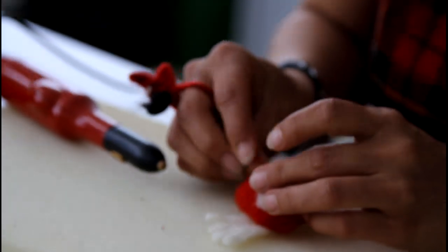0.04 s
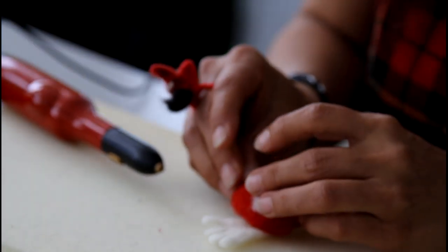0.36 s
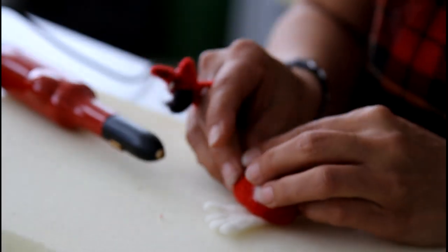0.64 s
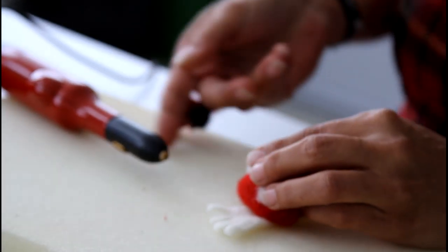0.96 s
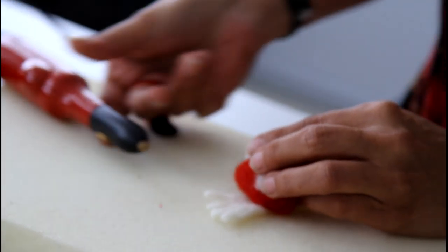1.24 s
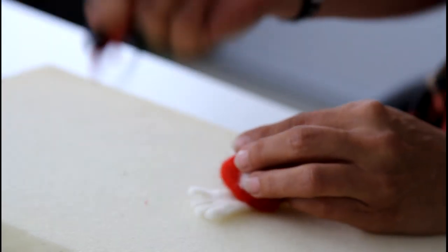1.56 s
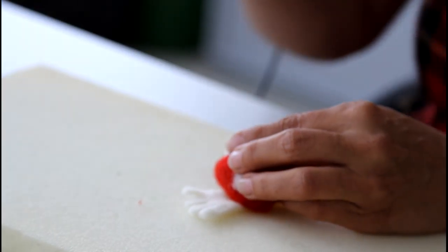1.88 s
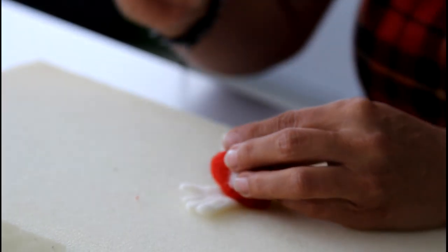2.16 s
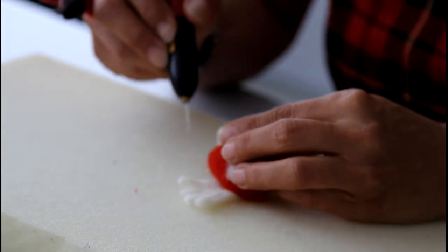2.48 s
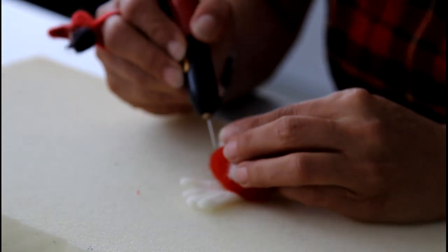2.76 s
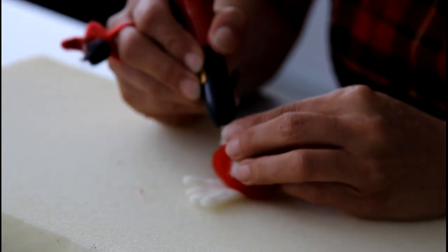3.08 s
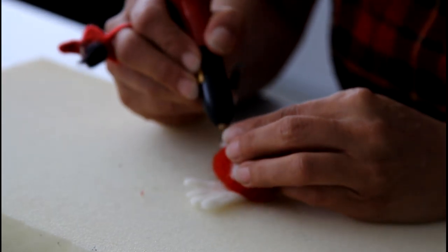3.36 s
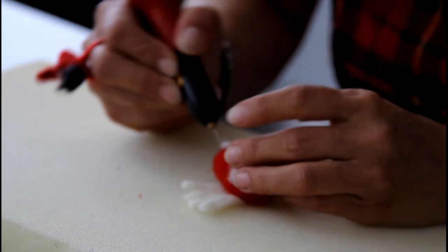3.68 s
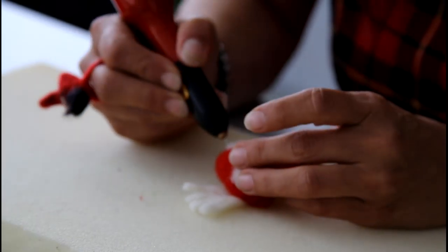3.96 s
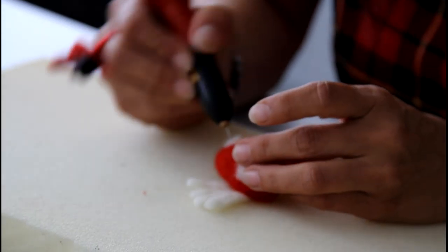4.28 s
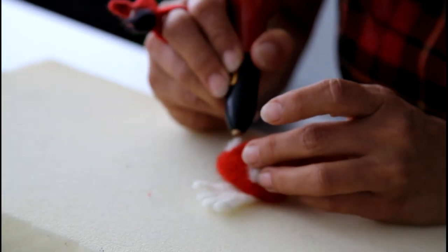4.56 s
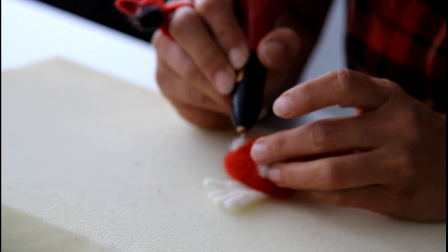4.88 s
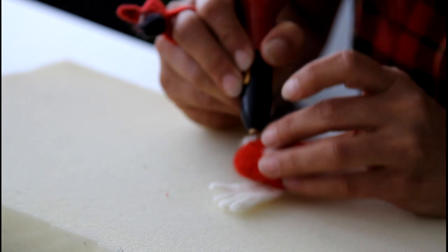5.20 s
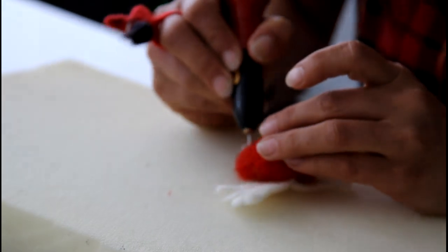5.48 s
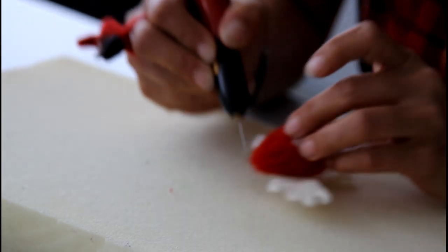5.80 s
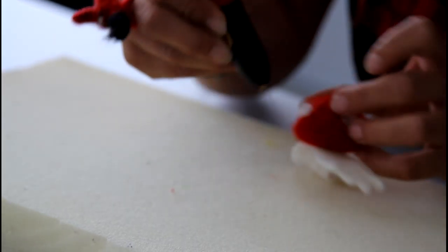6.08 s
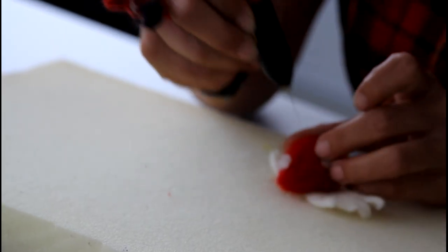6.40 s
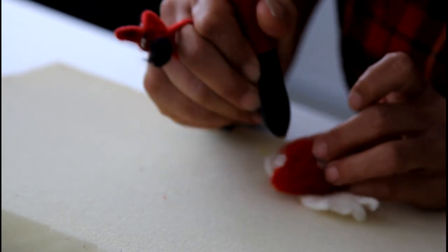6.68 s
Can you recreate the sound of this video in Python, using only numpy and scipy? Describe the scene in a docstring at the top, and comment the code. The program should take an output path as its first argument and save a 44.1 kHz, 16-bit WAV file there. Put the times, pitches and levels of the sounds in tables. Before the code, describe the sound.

In a quiet small room, hands set down a small tool and pick up an electric felting pen, with light plastic clacks and faint rubbing on a foam pad. The pen then starts and runs loudly: a fast, uneven rattle in a plastic casing, with a soft rasp of the needle in wool underneath. Midway through the rattle the table gives a brief low boom, and the pen carries on. The sound is close.

```python
"""In a quiet room, hands put a small tool down on a work table and pick up an electric felting pen.
At 2.4 s the pen starts: its needle bar shuttles about 37 times a second, knocking, bouncing and
chattering in a plastic casing whose ringing shifts with the grip. Each stroke punches the needle
into wool on a foam pad with a soft rasp. Near 4.6 s the table booms briefly; the pen runs on."""
import sys
import numpy as np
from scipy import signal
from scipy.fft import rfft, irfft
from scipy.io import wavfile

SR = 44100
rng = np.random.default_rng(int(sys.argv[2]) if len(sys.argv) > 2 else 0)


def inscribe(sig):
    """Save sig as 16-bit PCM at rate SR to the path in sys.argv[1].

    A 1-D sig is mono; a 2-D sig holds one channel per row.
    Samples are clipped to [-1, 1] before scaling.
    """
    pcm = np.round(np.clip(np.atleast_2d(sig).T, -1, 1) * 32767)
    wavfile.write(sys.argv[1], SR, pcm.astype(np.int16))


N = 297234
TIME = np.arange(N) / SR
PEN_LIFTED_S, START_S, STROKES_PER_S = 1.4, 2.402, 37

# Levels are relative: they compare the rows of a table, and the functions set the final loudness.
# hard knocks that stand out of the rattle: (time [s], level [dB], extra treble [dB])
HARD_KNOCKS = [(2.4311, -14.5, 5.5), (2.4655, -11, 3), (2.498, -14, 8), (2.5804, -12.5, -6),
               (2.6352, -12, 0), (2.7426, -9, -3), (2.776, -11, -2), (2.8439, -10, 3), (2.8787, -10, -4),
               (3.062, -12, 7), (3.2006, -9.5, -10), (3.3597, -11.5, 0), (3.5796, -11, -1),
               (3.66, -12.5, -2), (3.7744, -12, -8), (3.8817, -14, -6), (3.9819, -12.5, -4),
               (4.019, -13, -1), (4.3946, -12.5, -3), (4.5511, -15.5, 7), (4.7156, -14.5, 2),
               (4.8475, -15.5, 9), (5.0425, -12, -8), (5.1722, -16, 5), (5.284, -8.5, -7),
               (5.416, -11.5, -9), (5.4698, -10, -8), (5.5504, -17, 8), (5.5769, -13.5, 1),
               (5.6625, -14, -6), (5.936, -14, -1), (6.1212, -12.5, 1), (6.388, -11.5, -2),
               (6.4587, -15.5, 9.5), (6.4938, -15, 3)]
# how hard the pen rattles as the load on its motor changes: (time [s], level [dB])
RATTLE_LEVEL = [(2.41, -18), (2.75, -17.5), (2.93, -21.5), (3.06, -17), (3.35, -20), (3.6, -18.5),
                (4.05, -21), (4.42, -20.5), (4.62, -18), (4.9, -20.5), (5.2, -17), (5.5, -18), (5.68, -22),
                (6.0, -18.5), (6.4, -20), (6.6, -21.5), (6.74, -18)]
# how a knock on the bar's stop differs from loose chatter: (frequency [Hz], level [dB])
KNOCK_TONE = [(1000, -6), (2600, 0.5), (3500, 0), (5000, -1), (6500, -1), (9000, 2.5), (15000, 3)]
# overall tone of the plastic casing: (frequency [Hz], level [dB])
CASING_TONE = [(200, -35.5), (400, -27), (800, -16), (1300, -10), (1700, -7.5), (2400, -4), (3300, -2.5),
               (4200, -3.5), (6000, -3.5), (8000, -6.5), (10500, -11.5), (12500, -17), (16000, -25.5)]
# pitches at which the casing's shell rings: (frequency [Hz], width [Hz], level [dB])
SHELL_RINGS = [(895, 66, 7.5), (1723, 156, 5), (2256, 110, -1), (2950, 88, -9.5), (4870, 190, -3),
               (6500, 150, -15), (9360, 2400, -9.5)]
# the grip tunes the casing's hollow and nose piece, and damps the shell:
# (time [s], hollow pitch [Hz], hollow level [dB], nose pitch [Hz], shell and nose level [dB])
GRIP = [(2.45, 2660, -8, 7400, -4.5), (2.8, 2880, -9, 7250, -12), (3.2, 2960, -6, 7700, -9.5),
        (3.65, 3450, -3.5, 7650, -8), (4.17, 3450, 4, 7740, 3), (4.5, 3330, -4.5, 7650, -12),
        (5.03, 3380, 0, 7560, -5), (5.3, 3370, -7, 7500, -13), (5.55, 2880, -1.5, 7690, -6),
        (5.9, 3030, -3, 7530, -2), (6.05, 4240, -9, 8540, -7.5), (6.22, 4000, -9, 7400, -1),
        (6.65, 4200, -3.5, 7300, -3.5)]
# tone of the needle in wool and foam: (frequency [Hz], level [dB])
WOOL_TONE = [(60, -14.5), (200, -9), (550, -4), (900, 3.5), (2000, -10.5), (8000, -71)]
# the needle is pressed deeper into the wool: (time [s], level [dB], length [s])
PRESSES = [(2.72, -37, 0.1), (3.35, -36, 0.19), (3.66, -36, 0.13), (3.95, -34, 0.15), (4.19, -34, 0.14),
           (4.66, -38.5, 0.15), (4.87, -40, .1), (5.36, -41, 0.36), (5.8, -40, 0.11), (6.32, -37, 0.1)]
# plastic parts are put down and picked up:
# (time [s], clack level [dB], clack pitch [Hz], clack fade time [s], thud level [dB], scuff level [dB])
CLACKS = [(0.068, -35, 1000, .18, -36, -55), (0.581, -27.5, 2200, 0.026, -54, -55),
          (0.691, -28.5, 1600, 0.11, -34, -52), (0.753, -16, 1850, 0.048, -27, -30),
          (0.824, -30, 7500, 0.01, -44, -32), (1.176, -19, 6400, 0.016, -33.5, -35),
          (1.323, -21, 1400, 0.0082, -38, -58), (1.449, -21.5, 2900, 0.072, -45, -31),
          (1.456, -11.5, 3080, 0.03, -35.5, -23.5), (1.473, -15, 4470, 0.035, -47, -47),
          (1.701, -24.5, 1700, .03, -36, -55), (1.772, -22.5, 1770, .11, -29, -57),
          (1.881, -28.5, 1800, .04, -37, -55), (2.1155, -20, 1800, 0.013, -45, -55),
          (2.226, -26, 2000, .022, -54, -55)]
# pitches at which the lifted pen rings: (frequency [Hz], width [Hz], level [dB])
LIFTED_PEN_RINGS = [(1500, 110, 1), (2980, 130, -6), (3300, 300, -13), (4620, 100, -12)]
# hands and sleeves slide over the pad: (time [s], level [dB], length [s])
RUBS = [(0.23, -56, 0.052), (0.41, -54, 0.052), (0.71, -56, 0.11), (1.24, -47.5, 0.058),
        (1.43, -47.5, 0.044), (1.73, -53.5, 0.21), (2.05, -48.5, 0.037), (2.26, -48.5, 0.029),
        (2.35, -44.5, 0.058)]
# tone of that rubbing: (frequency [Hz], level [dB])
RUB_TONE = [(710, -34), (1200, -3), (1700, -2.5), (1930, -4.5), (3450, -5.5), (9030, -11.5), (15000, -21)]
# arms shift their weight on the table: (time [s], level [dB], length [s])
LEANS = [(0.16, -56, .08), (0.72, -52, .14), (1.74, -56, 0.13), (6.37, -60, 0.073)]
# tone of that leaning: (frequency [Hz], level [dB])
LEAN_TONE = [(15, -30), (40, -2), (100, -8), (300, -40), (2000, -57)]
# dull bumps through the table: (time [s], level [dB])
BUMPS = [(0.70, -49), (1.666, -47), (1.732, -49), (4.56, -37), (4.594, -41.5), (4.642, -38), (4.676, -34.5),
         (4.705, -43)]
# pitches at which the table top rings: (frequency [Hz], level [dB], fade time [s])
TABLE_RINGS = [(55, -21, .15), (124.7, -2.5, 0.5), (159.2, 0.5, 0.85), (245, -5.5, 0.29), (293, -7, 0.11),
               (416, -10, 0.088), (570, -13, .08)]
# how long the room's echo lasts: (frequency [Hz], fade time [s])
ECHO_FADE = [(200, 0.24), (1500, 0.44), (5000, 0.12), (14000, 0.19)]
# loudness of the room noise: (time [s], level [dB])
ROOM_LEVEL = [(0, -49), (1.3, -47.5), (2.7, -47.5), (3.0, -50.5), (4.0, -51), (5.0, -48.5), (5.8, -55.5),
              (6.74, -54)]
# tone of the room noise: (frequency [Hz], level [dB])
ROOM_TONE = [(15, -41), (25, -10), (191, 1), (290, -4.5), (462, -5.5), (501, -2), (558, -4.5), (856, -4.5),
             (1060, -10), (1150, -7.5), (2240, -10.5), (5140, -19.5), (5570, -17), (6540, -21), (8320, -21),
             (15000, -31)]


def felting_pen():
    """The bar's knocks and loose chatter shake the casing while the needle rasps in the wool."""
    rattle_db, = curves(RATTLE_LEVEL)
    times = stroke_times()
    energy = needle_bar(times, rattle_db)
    grinding = np.convolve(energy, np.ones(56) / 56)[:N]   # each hit grinds for about a millisecond
    loudness = np.sqrt(fading(grinding, fade_s=0.0048))
    knocks = with_tone(loudness * rng.choice([-1, 1], N), KNOCK_TONE)
    spin_up = from_db(np.interp(TIME - START_S, [-.03, -.016, -.003, .004], [-90, -15, -9, 0]))
    chatter = spin_up * from_db(rattle_db - 4) * grains(per_s=5000, spread_db=1.5)
    rattle = casing_rattle(knocks + chatter)
    ringing = casing_ringing(knocks + from_db(-9.5) * chatter, times)   # rung mainly by the knocks
    return from_db(-4) * rattle + from_db(-1) * ringing + from_db(-8) * wool_rasp(energy)


def stroke_times(jitter_s=0.0015):
    """Times of the hard knocks, then of the ordinary strokes that keep the motor's pace between them."""
    knock_times = np.array(HARD_KNOCKS)[:, 0]
    edges = np.r_[START_S, knock_times, TIME[-1]]
    ordinary = [START_S + 0.0036]
    for start, end in zip(edges, edges[1:]):
        count = max(round((end - start) * STROKES_PER_S), 1)
        ordinary.extend(np.linspace(start, end, count + 1)[1:-1])
    return np.r_[knock_times, rng.normal(ordinary, jitter_s)]


def needle_bar(times, rattle_db, bounces=4, bounce_gap_s=0.00351):
    """Energy of the bar's hits: each stroke strikes the stop, then bounces in its loose guide."""
    chance = rng.standard_normal((len(times), bounces + 1))
    force = np.minimum(chance[:, 0], 1)   # capped, so that the hard knocks stand out
    usual_db = np.interp(times, TIME, rattle_db)
    usual_db[times < HARD_KNOCKS[0][0]] -= 2   # the motor is still gathering speed
    hit_db = usual_db + 9.5 + 3 * force
    hit_db[:len(HARD_KNOCKS)] = np.array(HARD_KNOCKS)[:, 1] + 7
    gaps = bounce_gap_s * rng.uniform(.2, 1.8, (len(times), bounces))
    bounce_times = times[:, None] + np.cumsum(gaps, axis=1)
    first_bounce_db = usual_db + 6 + 2.5 * force   # a firmer stroke bounces harder
    bounce_db = first_bounce_db[:, None] - 2 * np.arange(bounces) + 2 * chance[:, 1:]
    return clicks(times, from_db(hit_db) ** 2) + clicks(bounce_times, from_db(bounce_db) ** 2)


def casing_rattle(hits):
    """The hits sound through the plastic; a square knock is brighter than a glancing one."""
    times, _, extra_db = np.transpose(HARD_KNOCKS)
    treble_db = fading(clicks(times, extra_db), fade_s=0.08) - 1
    rattle = with_tone(hits, CASING_TONE)
    return rattle + (from_db(treble_db) - 1) * filtered(rattle, 1, 7000, "high")


def casing_ringing(hits, times, hollow_width_hz=345, nose_width_hz=340, spread_db=7.5):
    """Shell, hollow and nose piece ring at their own pitches, shaped by the grip."""
    hollow_hz, hollow_db, nose_hz, shell_db = curves(GRIP)
    nose_db = shell_db + 4
    rings = [(hz, width, db + shell_db) for hz, width, db in SHELL_RINGS]
    rings += [(hollow_hz, hollow_width_hz, hollow_db), (nose_hz, nose_width_hz, nose_db)]
    # hollow and nose each have a weaker partner a little lower
    rings += [(0.89 * hollow_hz, hollow_width_hz, hollow_db - 7.5),
              (0.831 * nose_hz, nose_width_hz, nose_db - 9.5)]
    shaking = with_tone(hits, CASING_TONE)
    stroke_number = np.searchsorted(np.sort(times), TIME)
    out = 0
    for hz, width, db in rings:
        landing_db = rng.uniform(-spread_db, spread_db, len(times) + 1)   # no two strokes land alike
        out += resonance(shaking * from_db(db + landing_db[stroke_number]), hz, width)
    return out


def wool_rasp(energy):
    """The needle rasps through the wool on each stroke, louder when it is pressed deeper."""
    punch = np.sqrt(fading(energy, fade_s=0.038))
    punch /= np.sqrt(np.mean(punch ** 2))
    return swells(PRESSES, rest_db=-45) * with_tone(punch * rng.standard_normal(N), WOOL_TONE)


def plastic_parts():
    """Each part clacks, thuds on the pad and scuffs over it; once lifted, the pen rings along."""
    contacts = grains(per_s=13000, spread_db=0.5)
    out = 0
    for time, clack_db, hz, fade_s, thud_db, scuff_db in CLACKS:
        out += clatter(contacts, time, clack_db, hz, fade_s)
        out += clatter(contacts, time, thud_db, hz=420, fade_s=0.2)
        out += clatter(contacts, time, scuff_db, hz=7300, fade_s=0.2)
    lifted = out * (TIME > PEN_LIFTED_S)
    out += sum(from_db(db) * resonance(lifted, hz, width) for hz, width, db in LIFTED_PEN_RINGS)
    return filtered(out, 1, 13000, "low")


def clatter(contacts, time, db, hz, fade_s):
    """One touch is a fading burst of tiny contacts, heard in a band around hz."""
    burst = fading(clicks(time, from_db(db)), fade_s) * contacts
    width_gain = np.sqrt(2230 / hz)   # higher bands are wider, so they are turned down
    return width_gain * filtered(burst, 2, [hz / 2.5, hz * 1.46], "band")


def hands_and_arms():
    """Skin and cloth rub on the pad, and leaning arms make the table rumble."""
    before_start = TIME < START_S
    fibres = with_tone(grains(per_s=8000, spread_db=3.5), RUB_TONE)
    rub = swells(RUBS, rest_db=-67) * before_start * fibres
    steady_db = np.where(before_start, -67, -np.inf)   # the faint steady rumble stops as the pen starts
    return rub + swells(LEANS, steady_db) * with_tone(rng.standard_normal(N), LEAN_TONE)


def table_boom():
    """Soft bumps set the table top ringing at its low pitches."""
    pushes, out = sum(clicks(time, from_db(db)) for time, db in BUMPS) + 1e-18, 0
    for hz, db, fade_s in TABLE_RINGS:
        decay, angle = from_db(-60 / (fade_s * SR)), 2 * np.pi * hz / SR
        feedback = [1, -2 * decay * np.cos(angle), decay ** 2]
        out += from_db(db) * signal.lfilter([0, np.sin(angle)], feedback, pushes)
    return out


def moving_echo(sound, turns_per_s, count=4):
    """The pen keeps moving, so one pattern of echoes gives way to the next."""
    rates = turns_per_s * np.sqrt(np.arange(1, count + 1))
    shares = np.array([np.cos(np.pi * (rate * TIME + rng.random())) for rate in rates])
    shares /= np.linalg.norm(shares, axis=0)
    return sum(room_echo(sound * share, first_echo_s=0.003) for share in shares)


def room_echo(sound, first_echo_s, bands=8):
    """The walls of a small room return a blur of echoes that fades soonest in the treble."""
    age, tail = TIME[:SR // 2], 0
    edges = np.geomspace(80, 18000, bands + 1)
    for low, high in zip(edges, edges[1:]):
        noise = filtered(rng.standard_normal(len(age)), 2, [low, high], "band")
        tail += noise * from_db(-60 * age / at_hz(ECHO_FADE, np.sqrt(low * high)))
    tail *= age > first_echo_s
    return signal.fftconvolve(sound, tail / np.linalg.norm(tail))[:N]


def room_noise():
    """A faint hush with two soft pitches in it, and a thin high whine."""
    level_db, = curves(ROOM_LEVEL)
    air = with_tone(rng.standard_normal(N), ROOM_TONE)
    air += from_db(2) * resonance(air, 1137, width_hz=225) + from_db(-8) * resonance(air, 222, width_hz=19)
    whine = from_db(-64) * np.sin(2 * np.pi * 15672 * TIME)
    return from_db(level_db + 1.5) * air + whine


def from_db(db):
    """Turn decibels into a number to multiply by."""
    return 10 ** (np.asarray(db) / 20)


def curves(rows):
    """Join a table's points in time with straight lines, one curve for each column."""
    times, *columns = np.transpose(rows)
    return [np.interp(TIME, times, column) for column in columns]


def at_hz(rows, hz):
    """Read a table at any frequency, with the octaves evenly spaced."""
    known_hz, values = np.transpose(rows)
    return np.interp(np.log(np.maximum(hz, 1)), np.log(known_hz), values)


def with_tone(sound, tone, size=8192):
    """Filter a sound by a tone table; white noise keeps its power."""
    hz = np.arange(size // 2 + 1) * SR / size
    cepstrum = irfft(np.log(from_db(at_hz(tone, hz))))
    # fold it in half so that the filter never rings before a hit (minimum phase)
    cepstrum[1:size // 2] *= 2
    cepstrum[size // 2 + 1:] = 0
    response = irfft(np.exp(rfft(cepstrum)))
    return signal.fftconvolve(sound, response / np.linalg.norm(response))[:N]


def filtered(sound, order, hz, keep):
    """Keep the "low" part, the "high" part or a "band" of a sound."""
    return signal.sosfilt(signal.butter(order, hz, keep, fs=SR, output="sos"), sound)


def resonance(sound, hz, width_hz, block=256):
    """Let a sound ring around one pitch, which may move."""
    decay, pitch = np.exp(-np.pi * width_hz / SR), np.broadcast_to(hz, sound.shape)
    feed = np.array([1, 0, -1]) * (1 - decay ** 2) / 2
    out, state = np.zeros(len(sound)), np.zeros(2)
    for i in range(0, len(sound), block):
        feedback = [1, -2 * decay * np.cos(2 * np.pi * pitch[i] / SR), decay ** 2]
        out[i:i + block], state = signal.lfilter(feed, feedback, sound[i:i + block] + 1e-18, zi=state)
    return out


def clicks(times, heights):
    """One click of the given height at each time."""
    samples = np.maximum(np.ravel(times) * SR, 0).astype(int)
    return np.bincount(samples, np.ravel(heights), minlength=N)[:N]


def fading(hits, fade_s):
    """A curve that jumps at each hit and falls to a thousandth in fade_s."""
    return signal.lfilter([1], [1, -from_db(-60 / (fade_s * SR))], hits + 1e-18)


def grains(per_s, spread_db):
    """Random tiny contacts of uneven size, with an average power of 1."""
    sizes = from_db(spread_db * np.minimum(rng.exponential(1, N), 4)) * rng.choice([-1, 1], N)
    contacts = sizes * (rng.random(N) < per_s / SR)
    return contacts / np.std(contacts)


def swells(rows, rest_db):
    """A loudness that rests low, then rises and falls smoothly with each movement."""
    power = sum(from_db(db) ** 2 * .5 ** ((2 * (TIME - time) / length) ** 2) for time, db, length in rows)
    return np.sqrt(from_db(rest_db) ** 2 + power)


def scene():
    """Pen, hands and table, heard with their room."""
    pen = felting_pen()
    handling = plastic_parts() + hands_and_arms()
    echoes = from_db(-11.5) * moving_echo(pen, turns_per_s=1.5)
    echoes += from_db(-3) * room_echo(handling, first_echo_s=0.004)
    return (pen + handling + table_boom() + echoes + room_noise())[None]


def record(dry):
    """Turn the sound up a little, round its highest peaks and cut the treble above 16 kHz."""
    rounded = 1.47 * np.tanh(dry / 1.302)
    return signal.sosfilt(signal.ellip(10, .1, 80, 16000, fs=SR, output="sos"), rounded)


dry = scene()
out = record(dry)
inscribe(out)
```